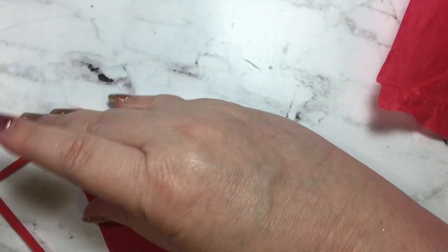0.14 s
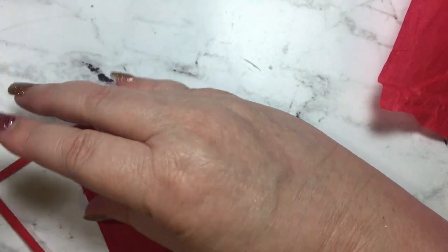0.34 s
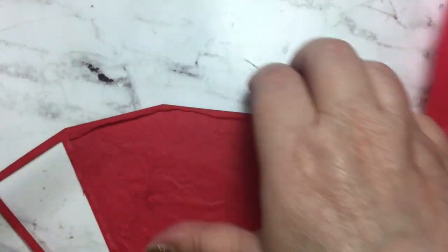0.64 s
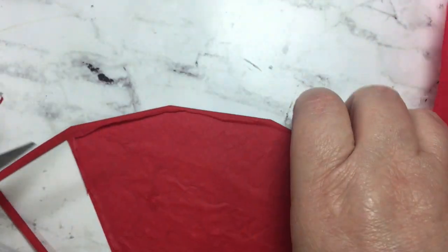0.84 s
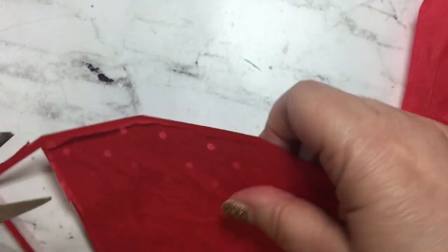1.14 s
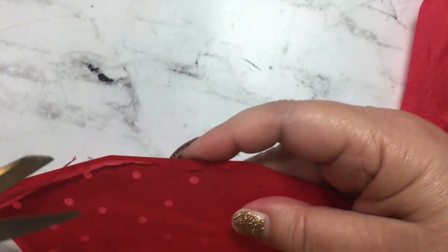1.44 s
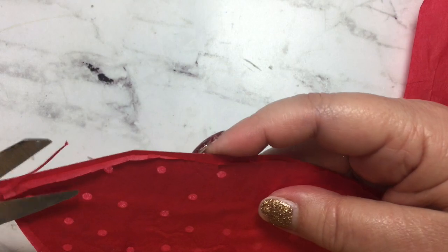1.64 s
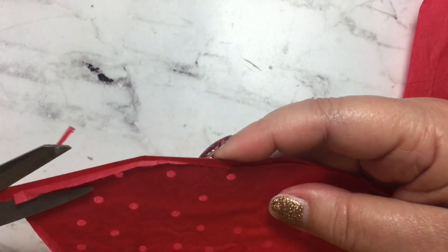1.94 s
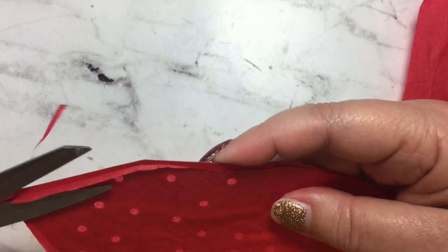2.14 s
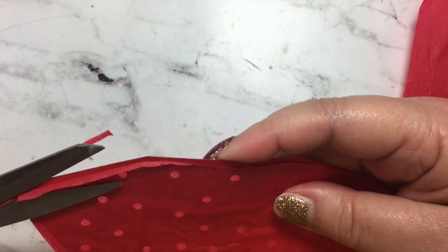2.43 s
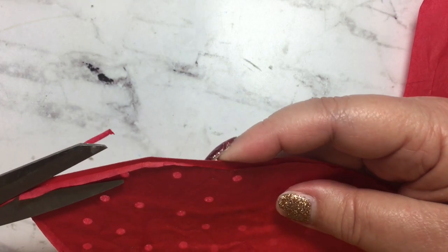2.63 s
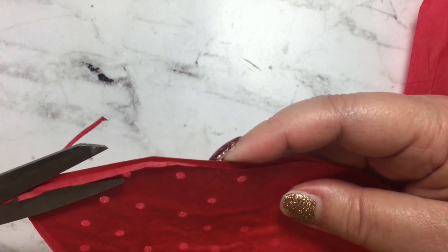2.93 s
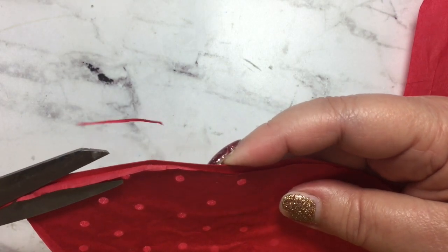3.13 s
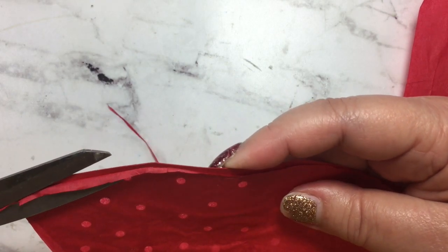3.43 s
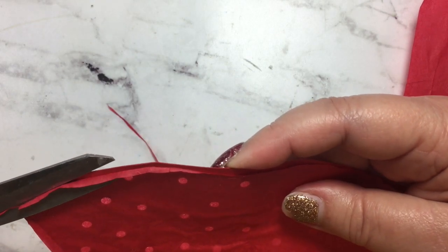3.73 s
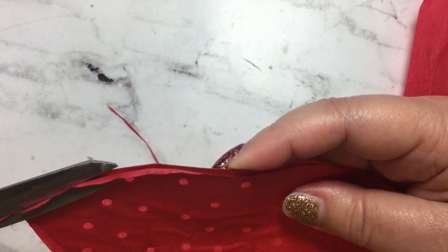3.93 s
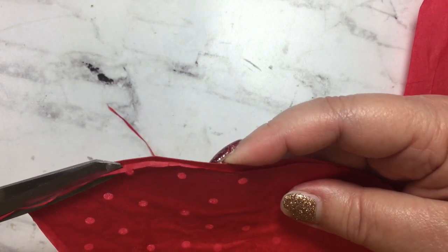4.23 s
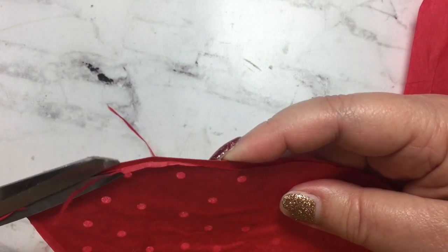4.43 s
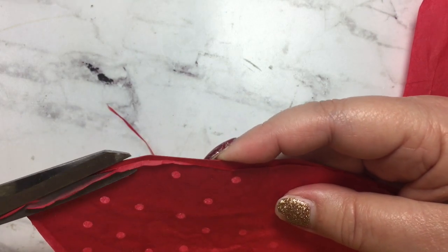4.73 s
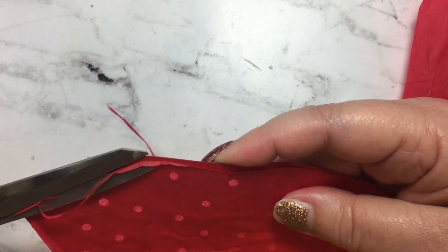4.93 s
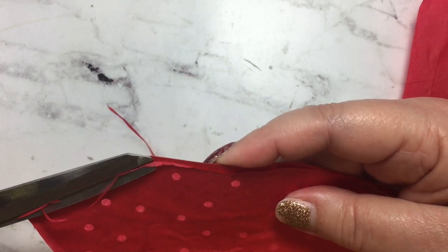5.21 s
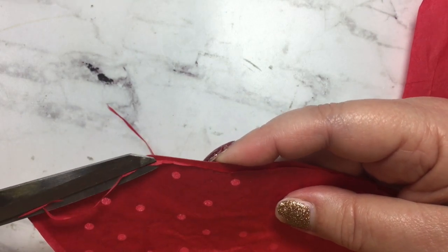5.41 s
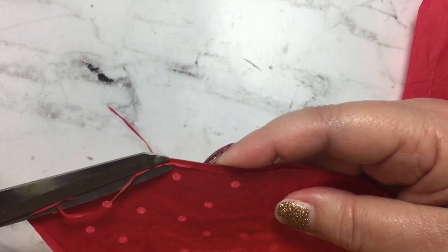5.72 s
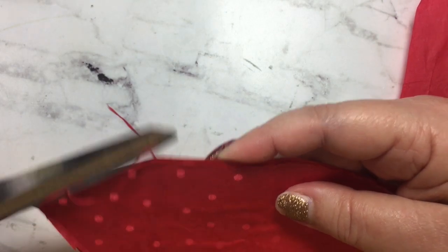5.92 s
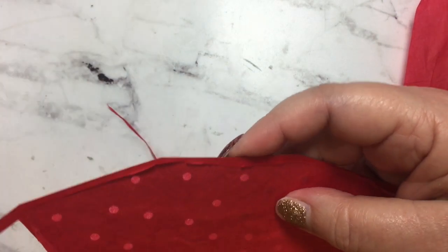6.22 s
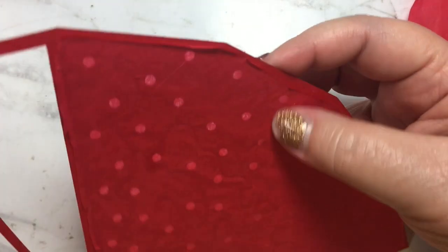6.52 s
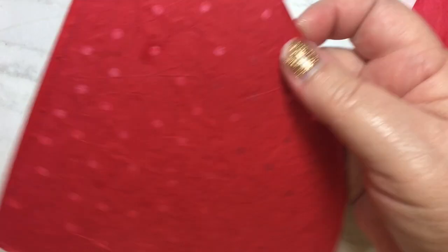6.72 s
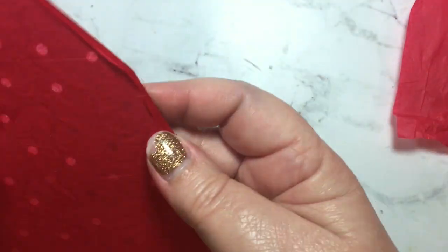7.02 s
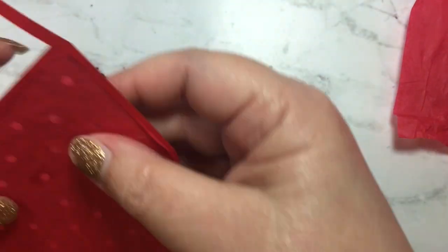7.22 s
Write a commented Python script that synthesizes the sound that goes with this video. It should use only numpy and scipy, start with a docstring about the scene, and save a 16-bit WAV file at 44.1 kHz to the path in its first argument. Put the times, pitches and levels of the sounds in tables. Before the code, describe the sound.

A small quiet room, heard close, with low air noise and a very faint wandering drone. From 0 to 1.3 s a hand smooths tissue paper: short soft rubs, fine crinkles and crisp snaps, sharpest near 0.75, 1.15 and 1.3 s, with faint hand thumps. Scissors start softly around 1.4 s, with a clearer pop at 1.8 s, a faint hollow scrape at 2.1 s and a crisp bite at 2.9 s. From 3.1 to 4.3 s the snips come quicker and stronger, dry crunches with thin blade hiss; slower, looser, brighter cuts follow from 4.8 s, ending in a sharp snip at 5.95 s. A paper rub follows, then at 6.4 s the steel clinks brightly on the counter and bounces. Between 6.7 and 6.9 s a cluster of hard knocks clatters over a low dragging rumble; another bump and a bright papery scuff come at 7.1 s, then last soft rustles.

```python
"""Quiet room, at a counter: scissors trim tissue paper along the edge of a cardstock panel.
A hand first smooths the tissue: soft friction noise with crinkles and snaps. The blades then crunch through it
in short strokes, random fibre breaks that sound the card and hiss on the steel edges.
The steel scissors clink down, and the panel is slid, turned and bumped: damped modes of steel and counter.
Low air noise, a faint wandering drone and a short room tail lie underneath."""
import sys
import numpy as np
from scipy import signal
from scipy.fft import rfft, irfft, next_fast_len
from scipy.io import wavfile
from scipy.ndimage import uniform_filter1d, map_coordinates

SR = 44100
rng = np.random.default_rng(int(sys.argv[2]) if len(sys.argv) > 2 else 0)


def file_out(sig):
    """Save sig as 16-bit WAV at sys.argv[1]."""
    # one column per channel
    cols = np.atleast_2d(sig).T
    # limit, then scale
    lim = np.clip(cols, -1, 1)
    pcm = np.round(lim * 32767).astype(np.int16)
    wavfile.write(sys.argv[1], SR, pcm)


N = 324576  # samples

# Squeezes of the blades. Each row: start in seconds, length in seconds, crest as share of length, card level in dB.
CUTS = [ (1.37, .2, 0.18, -53), (1.681, 0.041, 0.23, -50.5), (1.761, 0.057, 0.4, -50.5),
        (1.94, 0.032, 0.71, -57.5), (2.065, 0.23, 0.43, -60), (2.433, 0.022, 0.88, -44.5),
        (3.136, 0.044, 1, -48.5), (3.396, 0.028, .3, -51), (3.434, 0.034, .2, -53),
        (3.579, 0.031, 0.66, -46), (3.621, 0.055, 0.5, -50.5), (3.771, 0.027, 0.94, -49.5),
        (3.852, 0.033, 0.28, -43.5), (3.907, 0.07, 0.3, -45), (4.1, 0.018, 0.27, -39),
        (4.139, 0.043, 0.14, -45.5), (4.324, 0.04, 0.66, -36), (4.529, .028, 0.72, -54),
        (4.785, 0.25, 0.14, -50), (5.074, 0.02, 1, -52), (5.107, 0.047, 0.81, -41.5),
        (5.377, 0.051, 0.47, -44.5), (5.532, 0.11, 0.55, -43.5), (5.76, 0.09, .2, -61),
        (5.886, 0.04, 1, -39.5), (5.952, 0.0089, 0.061, -33.5)]
# Skin, card and blades sliding over paper. Each row: start in seconds, length in seconds, crest as share of length,
# hiss level in dB, body over hiss in dB (levels before the trims in rubs()).
RUBS = [ (0.026, 0.078, 0.95, -49, -12), (0.239, 0.027, 0.74, -46, -8.5),
        (0.286, 0.062, 0.97, -42.5, -13.5), (0.518, 0.027, 0.22, -37.5, -15.5),
        (0.737, .09, 0.15, -39, -11), (0.894, 0.061, 0.56, -49.5, 1.5), (.972, 0.023, 0.86, -42, -11),
        (1.041, 0.075, 0.35, -53, -8.5), (1.119, 0.075, 0.29, -40.5, -13.5), (1.21, 0.073, 0.74, -49.5, -6),
        (1.276, 0.047, 0.5, -41, 0.5), (1.335, .05, .4, -51, 0.5), (6.024, 0.029, 0.88, -33, -2),
        (6.339, 0.094, 0.78, -55.5, 4), (6.608, 0.14, 0.5, -45.5, -0.5), (7.025, 0.04, 0.34, -46, 3.5),
        (7.085, 0.013, 0.38, -28, -5.5), (7.197, 0.1, 0.65, -42, -7.5), (7.29, 0.078, 0.33, -42.5, -9)]
# Clearest creases and blade bites. Each row: time in seconds, pop in dB, tick in dB, pop in Hz, tick in Hz.
SNAPS = [ (0.0937, -48.5, -47.5, 1660, 3260), (0.5438, -46, -53, 1650, 5980),
         (0.7376, -42.5, -51, 1290, 3440), (.754, -51, -34, 2110, 4480), (.7666, -63, -32.5, 2070, 4530),
         (0.781, -47, -42, 2500, 3600), (0.847, -52, -48.5, 2390, 4560), (0.9262, -42.5, -41, 1770, 4070),
         (0.976, -35.5, -46, 2500, 4200), (1.062, -62, -54, 2300, 4200), (1.137, -31.5, -31.5, 1590, 3520),
         (1.226, -48.5, -53, 2030, 3690), (1.279, -43, -51, 1980, 3130), (1.304, -32, -36.5, 1660, 3170),
         (1.383, -44.5, -62, 1440, 3140), (1.48, -46, -64, 1600, 3280), (1.778, -27.5, -41, 960, 6160),
         (1.968, -44, -52, 825, 5200), (2.1119, -44, -58, 734, 4080), (2.7163, -68, -58.5, 1380, 5970),
         (2.8917, -34.5, -40, 1120, 3550), (4.148, -43, -58, 1540, 5070), (4.183, -45.5, -54.5, 1490, 5370),
         (4.354, -40, -47, 1800, 5560), (4.509, -64, -48.5, 1180, 12360), (4.8225, -36.5, -44, 1710, 4020),
         (4.8787, -46.5, -48.5, 1130, 6500), (4.9952, -52.5, -48.5, 1820, 6140),
         (5.156, -38.5, -46, 1480, 5550), (5.376, -47, -52.5, 1140, 4110), (5.414, -39, -46, 1460, 5200),
         (6.492, -60, -49, 2060, 4270), (6.549, -69, -50, 1520, 8350), (6.6764, -68, -43, 2400, 4820),
         (6.754, -34.5, -36.5, 2480, 4900), (6.8449, -53, -38.5, 1060, 4100),
         (7.34, -38.5, -59, 1520, 5280)]
# Scissors graze the counter, land and bounce. Each row: time in seconds, ring in dB, clack in dB before its trim.
CLINKS = [(6.401, -58, -41), (6.405, -21, -27), (6.4228, -39, -50), (6.4307, -33.5, -43), (6.446, -43, -55)]
# Hands and panel bump the counter. Each row: time in seconds, thud, knock and clatter in dB before the trim.
KNOCKS = [ (.926, -46.5, -55, -64), (1.305, -48.5, -65, -62), (6.422, -41.5, -59, -51),
          (6.7103, -30.5, -33.5, -47), (6.7684, -25, -25, -31.5), (6.7877, -30.5, -28, -29.5),
          (6.8485, -35.5, -41, -42.5), (6.8663, -30.5, -31.5, -30.5), (7.098, -35, -33, -39),
          (7.104, -38.5, -26.5, -45.5), (7.123, -40, -34.5, -46)]
# Soft heel of the hand landing. Each row: time in seconds, level in dB.
THUMPS = [(0.251, -44.5), (0.755, -51.5), (0.98, -53.5), (2.534, -56), (5.219, -57.5), (7.1, -34.5)]
# A blade sliding flat along the card. Each row: start in seconds, length in seconds, crest as share of length,
# level in dB.
SCRAPES = [(2.101, 0.11, .6, -56.5)]
# The opening blades touch. One row: time in seconds, level in dB, pitch in Hz.
PING = (2.9825, -49.5, 4000)
# Faint low drone. Each row: time in seconds, centre in Hz, level in dB.
DRONE = [(.4, 200, -63), (1.899, 215, -73), (2.4, 285, -67.5), (3.3, 235, -66.5), (5.1, 215, -67),
         (6.299, 200, -66.5)]
# Looseness of the card against the blades. Each row: time in seconds, slack from 0 to 1.
SLACK = [(2.3, 1), (2.43, 0.27), (4.35, 0.01), (4.8, 1)]
# Edge hiss over the card's crunch. Each row: time in seconds, relative level in dB.
EDGE_LEVEL_DB = [(1.35, -10), (1.68, -4.5), (2.05, 0), (2.45, -14), (3.75, -18), (4.2, -11.5), (4.55, -0.5),
                 (4.9, -8.5), (5.4, 0.5), (5.55, -9.5), (5.96, 2)]
# Modes of the scissors. Each row: nominal frequency in Hz, nominal level in dB, t60 in seconds.
STEEL_MODES = [(2600, -15, .03), (5425, -10, .038), (5626, 0, .044), (5820, -13, .04), (7070, -11, .02),
               (8400, -14, .015), (8900, -3, .024), (12290, -17, .026), (14140, -25, .03)]
# Modes of the counter. Each row: nominal frequency in Hz, nominal level in dB, t60 in seconds.
COUNTER_MODES = [(90, -11.5, .09), (141, -11, 0.085), (207.4, 0.5, 0.058), (308, -2.5, 0.042),
                 (663, -1, 0.057), (814, -1, .06), (1040, -8.5, 0.047), (1438, -1.5, 0.07),
                 (1966, -5, 0.032), (2536, -10, 0.074), (3190, -14.5, .07), (4150, -7, 0.037)]
# Spectrum of taut card. Each row: frequency in Hz, relative density in dB per Hz.
CARD_TAUT = [(260, -66), (450, -37), (618, -12.5), (905, -12), (1300, -9.5), (1490, -1.5), (1690, -10),
             (1850, 3), (2270, -17), (3000, -20.5), (3900, -28), (6600, -120)]
# Spectrum of slack card, lower and broader. Each row: frequency in Hz, relative density in dB per Hz.
CARD_SLACK = [(400, -23.5), (589, -16.5), (746, -7.5), (1100, 2.5), (1240, -5), (1480, 6), (1680, -2),
              (2050, 1), (2390, -22), (3900, -11.5), (6600, -120)]
# Spectrum of the blade edges. Each row: frequency in Hz, relative density in dB per Hz.
EDGE = [(1800, -40.5), (2700, -1.5), (4200, -3), (6700, -0.5), (7300, -15), (8900, -7), (10400, -24),
        (11700, -12.5), (15800, -14)]
# Spectrum of the blade edges late in the cut. Each row: frequency in Hz, relative density in dB per Hz.
EDGE_LAST = [(1800, -47), (3100, -0.5), (3500, 8.5), (4400, 1.5), (5300, 11), (6800, -2), (7500, -5),
             (10400, -14), (11400, -7), (13400, -15), (15800, -9)]
# Spectrum of a rub's body. Each row: frequency in Hz, relative density in dB per Hz.
RUB_BODY = [(240, -63), (400, -9.5), (994, 2.5), (2000, 4), (3000, -1), (3900, -34), (6600, -120)]
# Spectrum of a rub's hiss. Each row: frequency in Hz, relative density in dB per Hz.
RUB_HISS = [(1410, -44), (2400, -1), (5750, -3), (10300, -10.5), (15100, -14.5), (16000, -21)]
# Spectrum of a flat blade scrape. Each row: frequency in Hz, relative density in dB per Hz.
SCRAPE = [(450, -37), (730, -2), (950, -9), (1100, 3), (1300, -21), (1900, -27), (3000, -41)]
# Spectrum of the scissors' contact. Each row: frequency in Hz, relative density in dB per Hz.
CLACK = [(300, -22), (1300, -28), (2000, -2), (2650, -2), (3600, -8.5), (7000, -10.5), (10000, -18),
         (16000, -25)]
# Spectrum of the scuff in a bump. Each row: frequency in Hz, relative density in dB per Hz.
BUMP = [(25, -33), (100, 7), (240, 12.5), (410, -14.5), (700, 2.5), (4200, -6), (15000, -48)]
# Spectrum of the air noise. Each row: frequency in Hz, relative density in dB per Hz.
AIR = [(15, -45), (55, 4), (150, -4), (320, -5), (470, -14), (1600, -13), (3000, -18.5), (10500, -26),
       (15800, -30)]
# Room decay. Each row: frequency in Hz, t60 in seconds.
ROOM_T60_S = [(200, 0.2), (1500, 0.096), (10000, 0.079)]

TOP_HZ = 15900
SQUEEZE_RISE_DB, SQUEEZE_FALL_DB = 7.5, 7.5  # the force swells to its crest, then eases
FEED_S, FEED_DB = 0.067, -27.5  # the paper slides faintly into the blades before they bite
FLEX_DB = 3  # the bending sheet changes its colour as it is cut
CRINKLES_PER_S, CRINKLE_DB, CRINKLE_SPREAD_DB = 28, -8.5, 6  # levels over the rub's table level
CRINKLE_POP_HZ, CRINKLE_TICK_HZ = 1460, 4200  # centres of a one-octave random spread
CRINKLE_OFF_CREST_DB = 2.5  # gain a whole rub's length away from its crest
DETUNE = 0.0059  # the hand's load shifts the counter modes from blow to blow, as a share of Hz


def amp(db):
    """Decibels to gain."""
    return 10 ** (np.asarray(db) / 20)


def unit(x):
    """Scale to rms 1."""
    return x / np.sqrt(np.mean(x ** 2) + 1e-20)


def along(points, hz):
    """Read (Hz, value) points on a log axis."""
    f, v = np.transpose(points)
    return np.interp(np.log(hz + 1), np.log(f + 1), v)


def colour(x, spectrum):
    """Minimum-phase filter with the given (Hz, dB) shape, via the folded cepstrum."""
    size = 4096
    gain = amp(along(spectrum, np.fft.rfftfreq(size, 1 / SR)))
    cepstrum = irfft(np.log(gain))
    cepstrum[1:size // 2] *= 2
    cepstrum[size // 2 + 1:] = 0
    impulse = irfft(np.exp(rfft(cepstrum)))
    return signal.fftconvolve(x, impulse)[:len(x)]


def band(x, lo_hz, hi_hz, order=2):
    """Causal band-pass."""
    edges_hz = [lo_hz, min(hi_hz, SR / 2 - 100)]
    return signal.sosfilt(signal.butter(order, edges_hz, "band", fs=SR, output="sos"), x)


def struck(x, window_s):
    """Scale a hit to rms 1 over its first moments."""
    return x / np.sqrt(np.mean(x[:int(window_s * SR)] ** 2) + 1e-20)


def burst(t, t60_s, spike):
    """A contact: one sharp push and a quickly dying crackle."""
    x = rng.standard_normal(len(t)) * amp(-60 * t / t60_s)
    x[0] += spike
    return x


def add(track, start_s, x):
    """Mix x into the track."""
    start = max(round(start_s * SR), 0)
    track[start:start + len(x)] += x[:max(N - start, 0)]


def catching(rate_hz, depth_db):
    """Smooth random gain, as of a contact that catches and frees."""
    knots = rng.standard_normal(int(N * rate_hz / SR) + 4)
    return amp(depth_db * map_coordinates(knots, [np.arange(N) * rate_hz / SR]))


def fibres(rate_hz, spread_db, smooth):
    """Random tiny slips and breaks of uneven size over a smooth friction noise."""
    sizes = amp(spread_db * np.clip(rng.standard_normal(N), -2, 2)) * rng.choice([-1, 1], N)
    breaks = sizes * (rng.random(N) < rate_hz / SR)
    return unit(breaks) + smooth * rng.standard_normal(N)


def stroke(source, start_s, length_s, crest, rise_db, fall_db, release_s, ripple, lead_s=0, lead_db=-40):
    """One movement's share of a source: lead-in, crest and stop; returns its start and rms-1 signal."""
    first_s = start_s - release_s - lead_s
    peak_s = start_s + np.clip(crest, 0, 1) * length_s
    end_s = start_s + length_s
    stop_s = end_s + 2 * release_s
    t = np.arange(max(int(first_s * SR), 0), min(int(stop_s * SR), N))
    # every new grip and contact point gives the sheet other brief resonances
    echo = burst(np.arange(SR // 100) / SR, t60_s=.009, spike=0)
    echoed = signal.fftconvolve(source[t], echo / np.linalg.norm(echo))[:len(t)]
    knots_s = [first_s, start_s - release_s, start_s, peak_s, end_s, stop_s]
    envelope_db = np.interp(t / SR, knots_s, [-40, lead_db, -rise_db, 0, -fall_db, -40])
    x = (source[t] + ripple * echoed) * amp(envelope_db)
    return t[0] / SR, x / np.sqrt(np.sum(x ** 2) / (length_s * SR) + 1e-20)


def ringing(modes, t):
    """Damped modes, each excited a little differently at every call."""
    out = np.zeros(len(t))
    for hz, db, t60_s in modes:
        gain = rng.choice([-1, 1]) * amp(db + rng.normal(0, 1.5) - 60 * t / t60_s)
        out += gain * np.sin(2 * np.pi * hz * t)
    return out


def room_tone(air_db=-60.5, half_width_hz=42, waver_db=2.0):
    """Low ventilation noise and faint hiss, with a noise-band drone that wanders in pitch and level."""
    s, *columns = np.transpose(DRONE)
    hz, level_db = (np.interp(np.arange(N) / SR, s, c) for c in columns)
    narrow = band(rng.standard_normal(N) + 1j * rng.standard_normal(N), 1, half_width_hz)
    carrier = np.exp(2j * np.pi * np.cumsum(hz) / SR)
    drone = unit(np.real(narrow * carrier)) * catching(rate_hz=11, depth_db=waver_db)
    air = unit(colour(rng.standard_normal(N), AIR)) * catching(rate_hz=4.25, depth_db=0.33)
    return amp(air_db) * air + amp(level_db) * drone


def rubs(body_trim_db=-1, hiss_trim_db=-3.5):
    """Skin, card and blades slide over paper: fine, soft slip grain with sparser, coarser slips on top."""
    slips = fibres(rate_hz=2800, spread_db=5, smooth=.7) + .45 * fibres(rate_hz=110, spread_db=4, smooth=0)
    slips = slips * catching(rate_hz=86, depth_db=2.0)
    body, hiss = colour(slips, RUB_BODY), colour(slips, RUB_HISS)
    out = np.zeros(N)
    for start_s, length_s, crest, level_db, body_db in RUBS:
        release_s = 0.0025 + 0.26 * length_s  # longer movements fade more gently
        for source, db in (body, body_db + body_trim_db), (hiss, hiss_trim_db):
            s, x = stroke(source, start_s, length_s, crest, rise_db=8.5, fall_db=12.0,
                          release_s=release_s, ripple=.35, lead_s=0.14, lead_db=-29.5)
            add(out, s, amp(level_db + db) * x)
    return out


def snap(pop_db, tick_db, pop_hz, tick_hz, give_s=0.0012):
    """The sheet gives way: a bright tick with a softer-onset, damped pop of the stiff card."""
    t = np.arange(SR // 10) / SR
    push = band(burst(t, t60_s=.016, spike=4), 600, 2600, order=4)
    pop = band(push, pop_hz / 1.2, pop_hz * 1.176, order=1) * (1 - np.exp(-t / give_s))
    crack = band(burst(t, t60_s=0.014, spike=1.1), 1600, 14500)
    tick = band(crack, tick_hz / 1.123, tick_hz * 1.15, order=1)
    return amp(pop_db) * struck(pop, .008) + amp(tick_db) * struck(tick, .008)


def crinkles():
    """Small creases give way at random during a rub, slightly louder away from its crest."""
    out = np.zeros(N)
    for start_s, length_s, crest, level_db, body_db in RUBS:
        for place, size, pitch in rng.random((int(CRINKLES_PER_S * length_s), 3)):
            db = level_db + CRINKLE_DB + CRINKLE_SPREAD_DB * size
            db += CRINKLE_OFF_CREST_DB * abs(place - crest)
            scale = 2 ** (pitch - .5)
            crease = snap(db + body_db, db, scale * CRINKLE_POP_HZ, scale * CRINKLE_TICK_HZ)
            add(out, start_s + length_s * place, crease)
    return out


def snaps():
    """The creases and bites that stand out, each a pop and a tick."""
    out = np.zeros(N)
    for s, pop_db, tick_db, pop_hz, tick_hz in SNAPS:
        add(out, s, snap(pop_db, tick_db, pop_hz, tick_hz))
    return out


def thumps(hz=88, t60_s=0.095, attack_s=0.0023):
    """Flesh pushes the counter slowly, so only one low mode answers."""
    out, t = np.zeros(N), np.arange(SR // 4) / SR
    boom = np.sin(2 * np.pi * hz * t) * amp(-60 * t / t60_s) * (1 - np.exp(-t / attack_s))
    for s, db in THUMPS:
        add(out, s, amp(db) * struck(boom, 0.043))
    return out


def knocks(trim_db=-1, scuff_db=-3, attack_s=0.00058):
    """Bumps wake the counter's modes and a scuff, split into thud, knock and clatter bands."""
    out, t = np.zeros(N), np.arange(SR // 3) / SR
    ranges_hz = [(40, 450), (500, 1200), (1250, 14000)]
    for s, *levels_db in KNOCKS:
        modes = [(hz * (1 + DETUNE * rng.normal()), db, t60_s) for hz, db, t60_s in COUNTER_MODES]
        scuff = colour(burst(t, t60_s=0.063, spike=4.6), BUMP)
        blow = struck(ringing(modes, t), .016) + amp(scuff_db) * struck(scuff, .016)
        blow = blow * (1 - np.exp(-t / attack_s))
        for (lo_hz, hi_hz), db in zip(ranges_hz, levels_db):
            add(out, s, amp(db + trim_db) * struck(band(blow, lo_hz, hi_hz, order=3), .016))
    return out


def flexing(x, depth_db):
    """Brief peaks and dips, some 700 Hz wide and 25 ms long, drift through the sound."""
    z = signal.stft(x, nperseg=256)[2]
    field = uniform_filter1d(rng.standard_normal(z.shape), size=4, axis=0)
    field = uniform_filter1d(field, size=8, axis=1)
    return signal.istft(z * amp(depth_db * unit(field)), nperseg=256)[1][:N]


def cuts():
    """Closing blades break fibres; the breaks sound the card and hiss on the steel edges."""
    grip = catching(rate_hz=320, depth_db=2.1) * catching(rate_hz=80, depth_db=1.3)
    breaks = flexing(grip * fibres(rate_hz=1700, spread_db=4, smooth=.3), FLEX_DB)
    friction = breaks + 0.88 * grip * rng.standard_normal(N)
    t = np.arange(N) / SR
    slack = np.clip(np.interp(t, *np.transpose(SLACK)), 0, 1)
    card = (1 - slack) * unit(colour(breaks, CARD_TAUT)) + slack * unit(colour(breaks, CARD_SLACK))
    progress = np.clip((t - 4.3) / .5, 0, 1)  # the cut travels out toward the tips
    edge = (1 - progress) * unit(colour(friction, EDGE)) + progress * unit(colour(friction, EDGE_LAST))
    out = np.zeros(N)
    for start_s, length_s, crest, level_db in CUTS:
        release_s = 0.0013 + 0.13 * length_s  # longer strokes fade more gently
        hiss_db = np.interp(start_s, *np.transpose(EDGE_LEVEL_DB))
        for source, db in (card, 0), (edge, hiss_db):
            s, x = stroke(source, start_s, length_s, crest, SQUEEZE_RISE_DB, SQUEEZE_FALL_DB,
                          release_s, ripple=.45, lead_s=FEED_S, lead_db=FEED_DB)
            add(out, s, amp(level_db + db) * x)
    return out


def scrapes():
    """A sliding blade draws a hollow note from the card: slips through the card's narrow colour."""
    out = np.zeros(N)
    slips = colour(fibres(rate_hz=770, spread_db=4.5, smooth=.3), SCRAPE)
    for start_s, length_s, crest, level_db in SCRAPES:
        # negative rise and fall: both ends louder than the crest
        s, x = stroke(slips, start_s, length_s, crest, rise_db=-2, fall_db=-1, release_s=.015, ripple=0)
        add(out, s, amp(level_db) * x)
    return out


def ping(t60_s=0.011):
    """One small, focused note from the blades, choked by the grip."""
    out, t = np.zeros(N), np.arange(SR // 20) / SR
    s, db, hz = PING
    note = np.sin(2 * np.pi * hz * t) * t * amp(-60 * t / t60_s)
    add(out, s, amp(db) * struck(note, .008))
    return out


def clinks(clack_trim_db=1):
    """Steel lands with a hard clack and rings briefly, damped by the hand."""
    out, t = np.zeros(N), np.arange(SR // 5) / SR
    for s, ring_db, clack_db in CLINKS:
        ring = struck(ringing(STEEL_MODES, t), .008)
        contact = burst(t, t60_s=.012, spike=1) + .12 * burst(t, t60_s=.04, spike=0)
        clack = struck(colour(contact, CLACK), .008)
        add(out, s, amp(ring_db) * ring + amp(clack_db + clack_trim_db) * clack)
    return out


def drag(rumble_db=-47, hiss_db=-59):
    """The hand drags the panel round in small jerks: low counter modes rumble under a faint paper hiss."""
    out, t = np.zeros(N), np.arange(SR // 5) / SR
    jerks = catching(rate_hz=54, depth_db=3.5) * rng.standard_normal(N)
    rumble = band(signal.fftconvolve(jerks, ringing(COUNTER_MODES, t))[:N], 120, 460)
    for source, level_db in (rumble, rumble_db), (colour(jerks, RUB_HISS), hiss_db):
        s, x = stroke(source, start_s=6.72, length_s=0.453, crest=0.68, rise_db=1, fall_db=11,
                      release_s=0.022, ripple=0.21)
        add(out, s, amp(level_db) * x)
    return out


def room(x):
    """A small, dry room: a 3 ms delay, then a noise tail whose treble dies first."""
    hz, t, z = signal.stft(rng.standard_normal(SR // 3), SR, nperseg=256)
    decay = amp(-60 * t / along(ROOM_T60_S, hz)[:, None])
    tail = signal.istft(z * decay, SR, nperseg=256)[1]
    delayed = np.pad(x, (int(.003 * SR), 0))
    return signal.fftconvolve(delayed, tail / np.linalg.norm(tail))[:N]


def scene():
    """All the handling, its room and the quiet behind it."""
    paper = rubs() + crinkles() + snaps()
    blades = cuts() + scrapes() + ping() + clinks()
    counter = thumps() + knocks() + drag()
    work = paper + blades + counter
    return (work + amp(-14.0) * room(work) + room_tone())[None]


def record(dry):
    """Remove everything from TOP_HZ up."""
    size = next_fast_len(N + SR // 2)
    keep = np.fft.rfftfreq(size, 1 / SR) < TOP_HZ
    return irfft(rfft(dry, size) * keep, size)[..., :N]


dry = scene()
out = record(dry)
file_out(out)
```